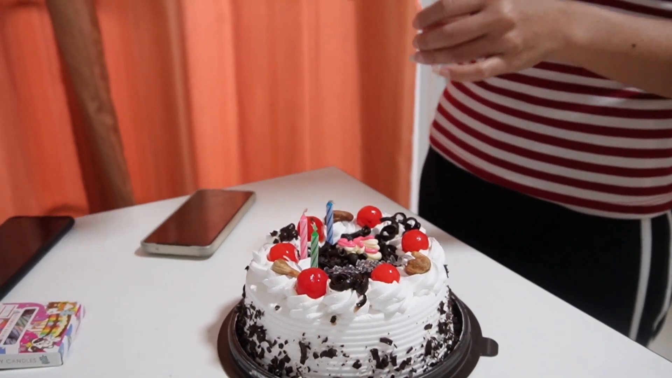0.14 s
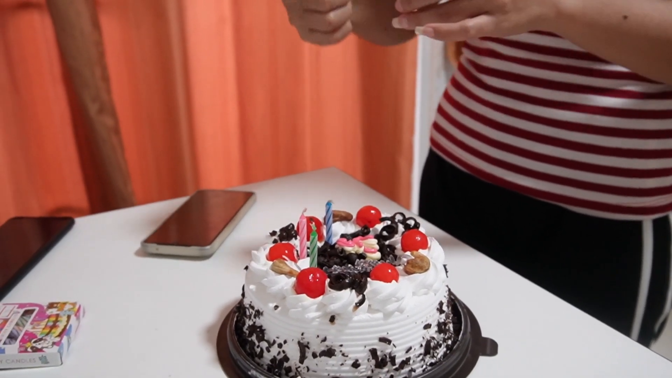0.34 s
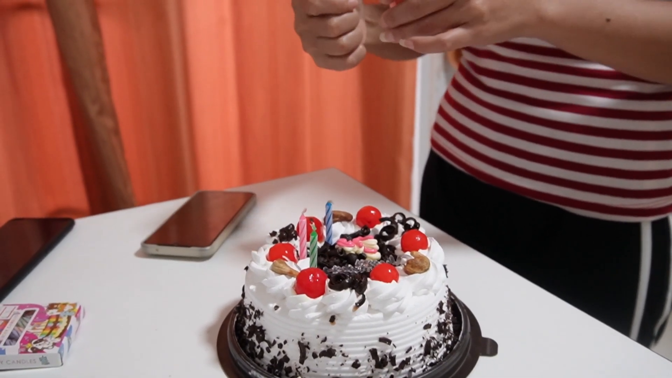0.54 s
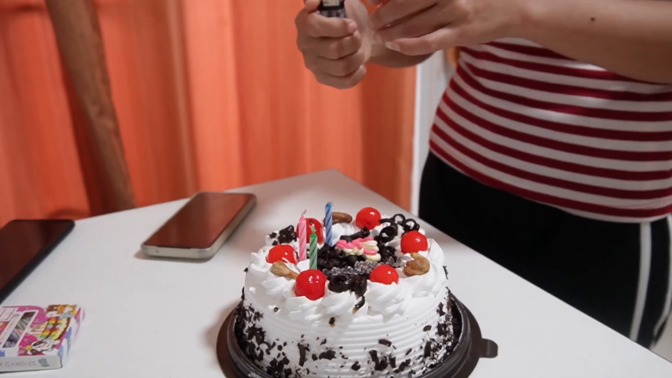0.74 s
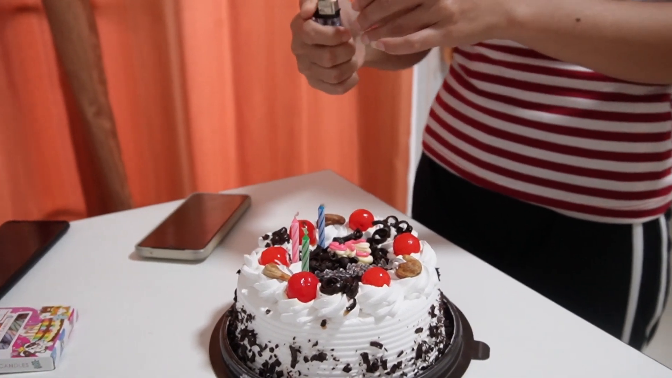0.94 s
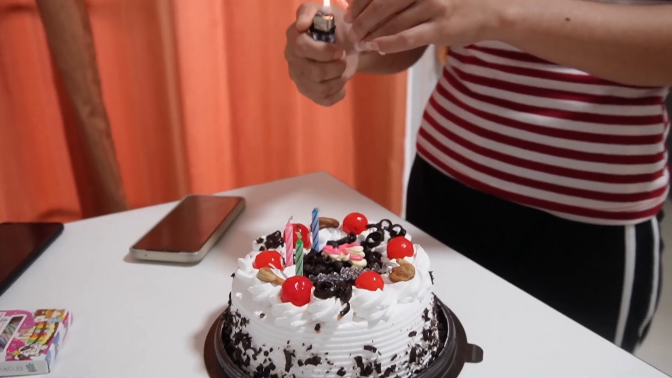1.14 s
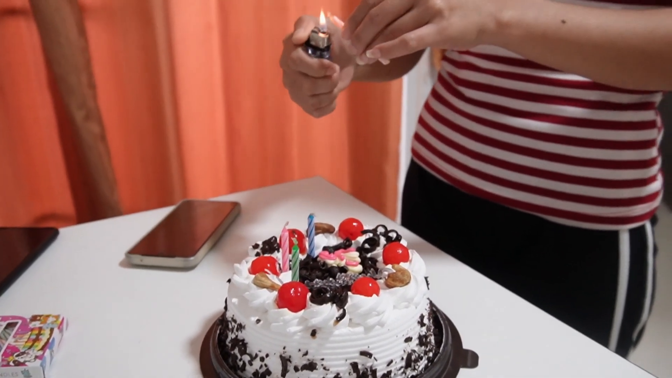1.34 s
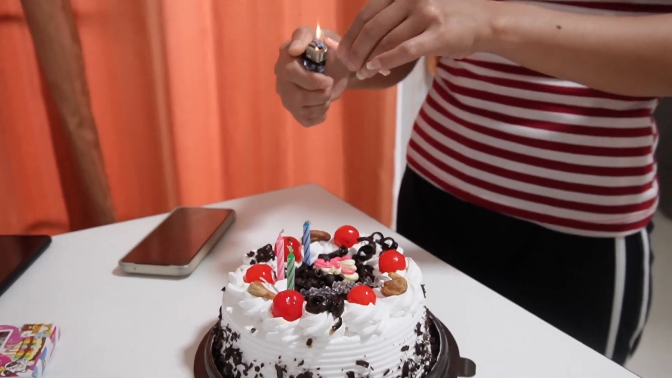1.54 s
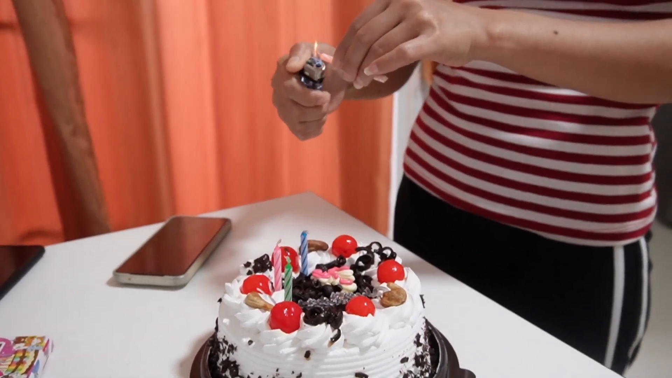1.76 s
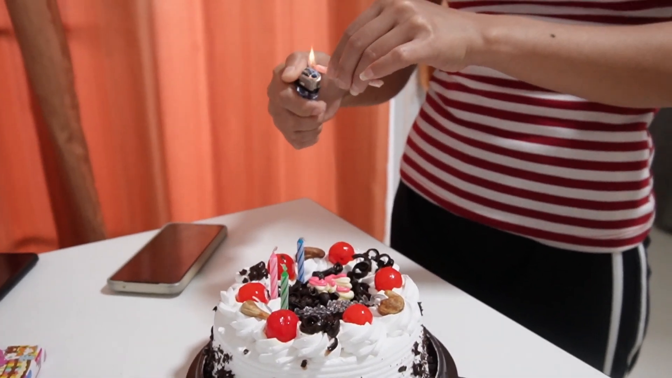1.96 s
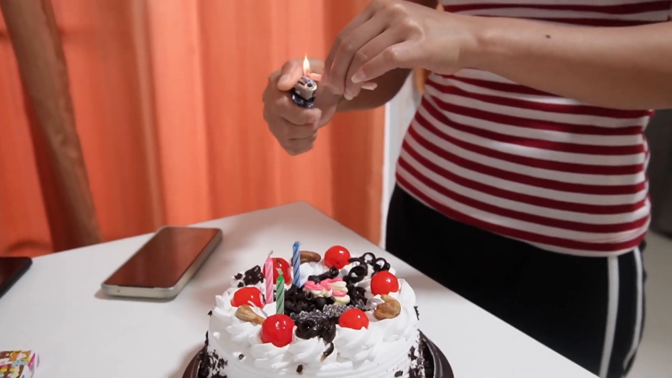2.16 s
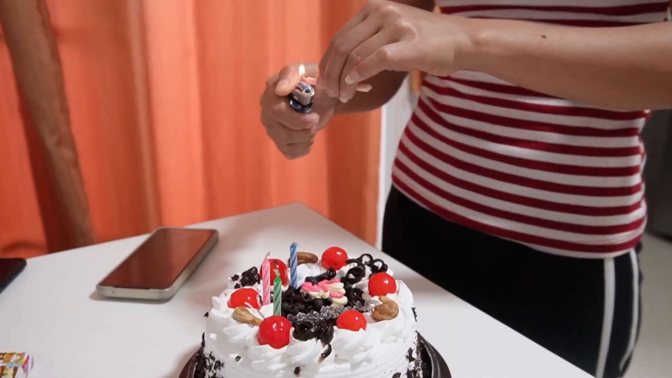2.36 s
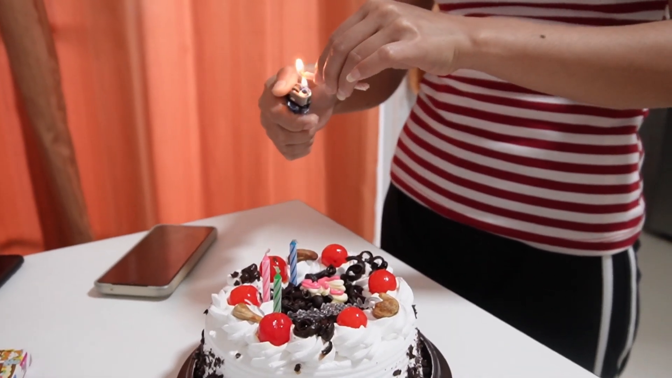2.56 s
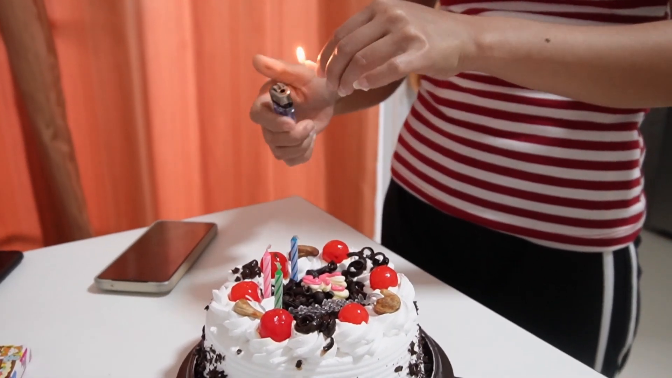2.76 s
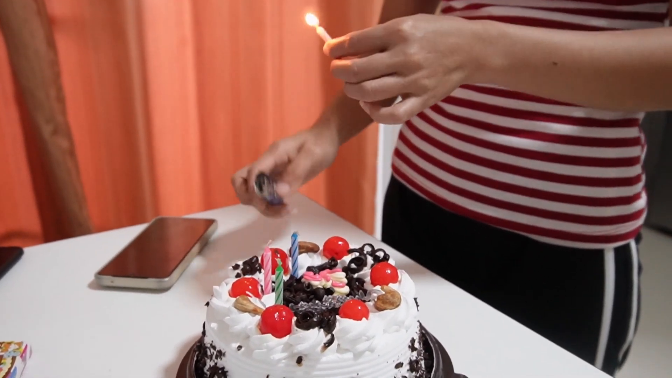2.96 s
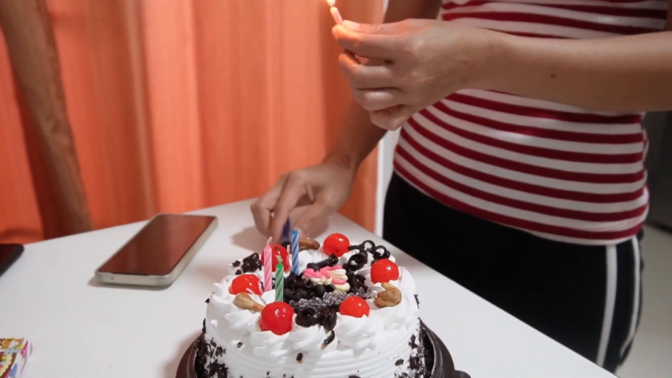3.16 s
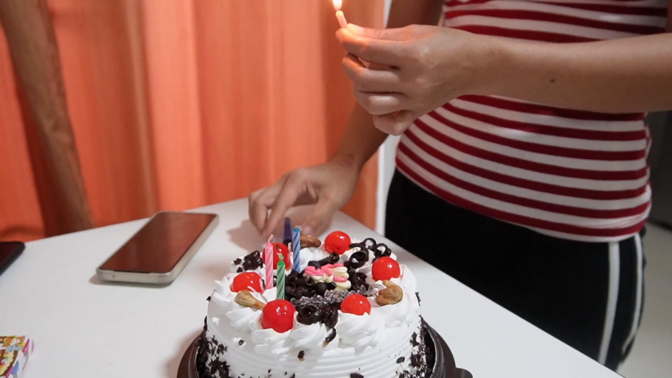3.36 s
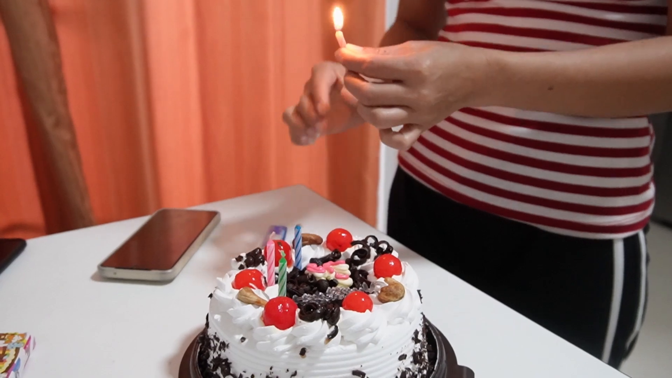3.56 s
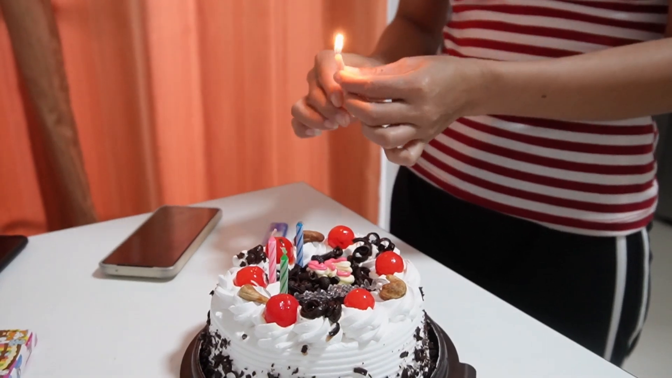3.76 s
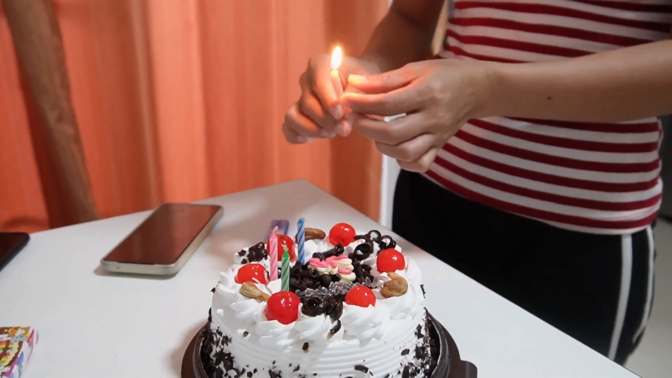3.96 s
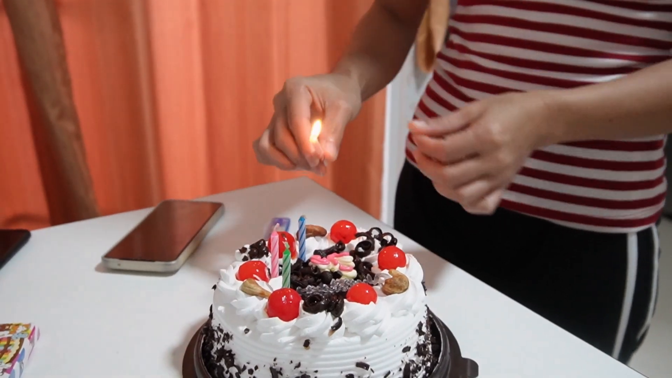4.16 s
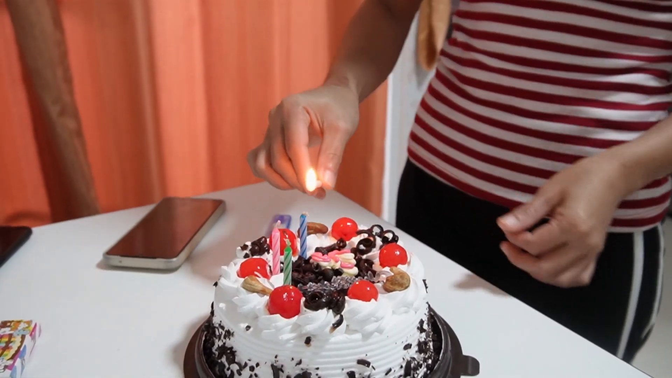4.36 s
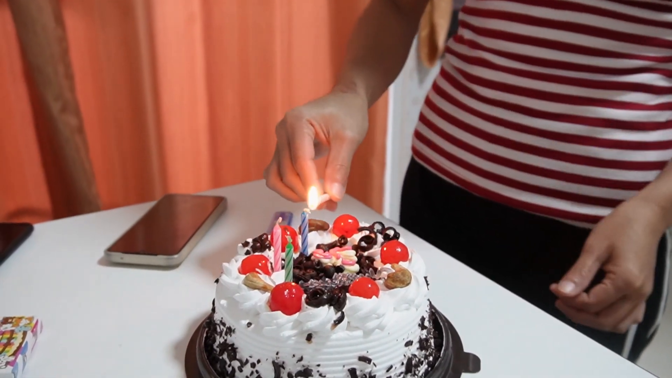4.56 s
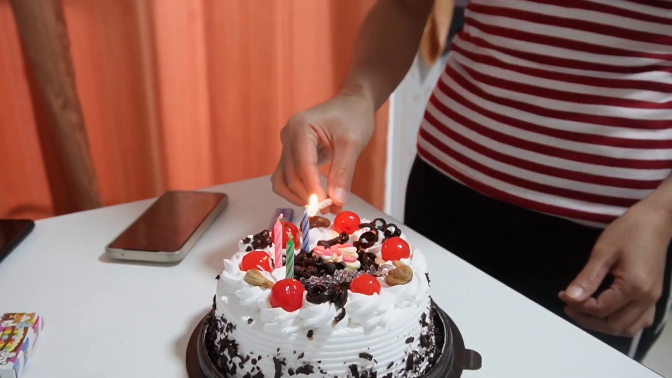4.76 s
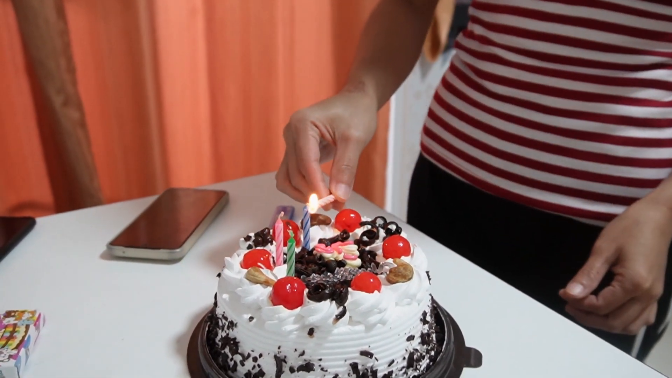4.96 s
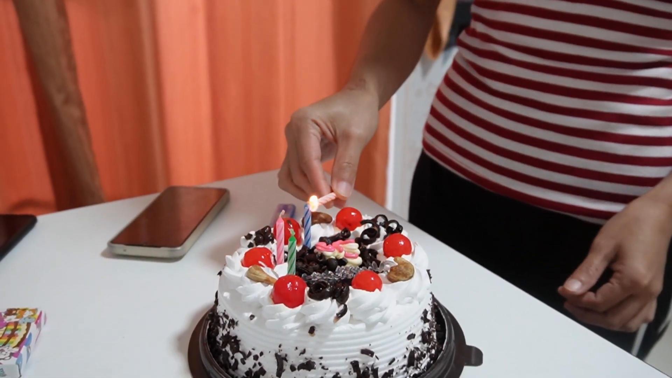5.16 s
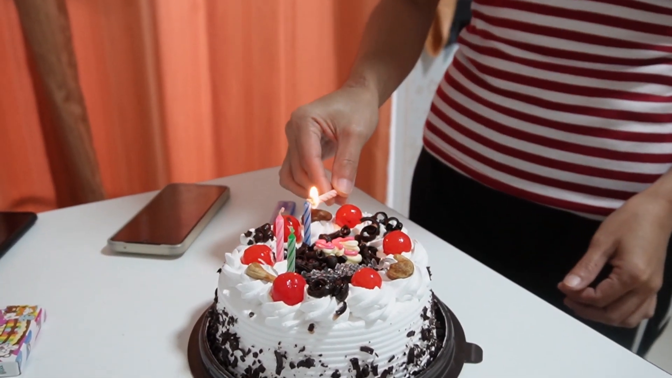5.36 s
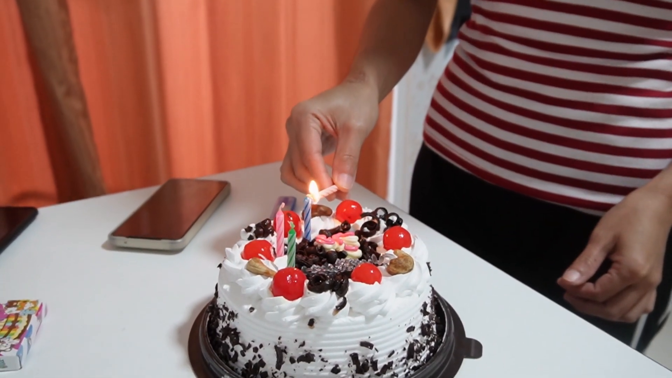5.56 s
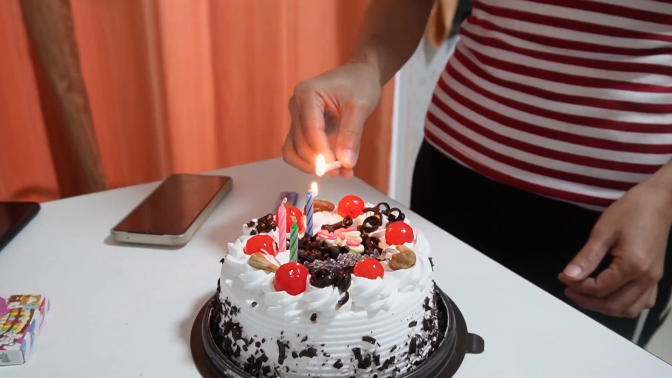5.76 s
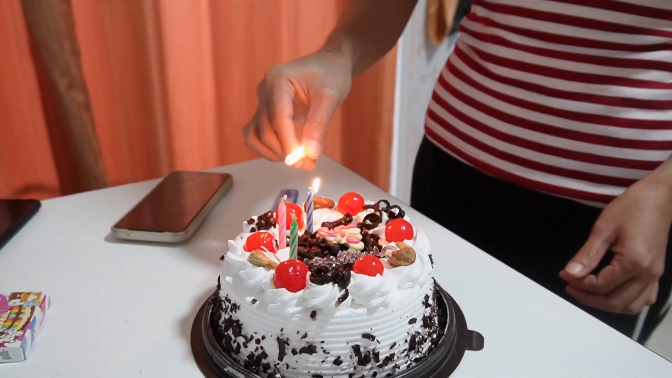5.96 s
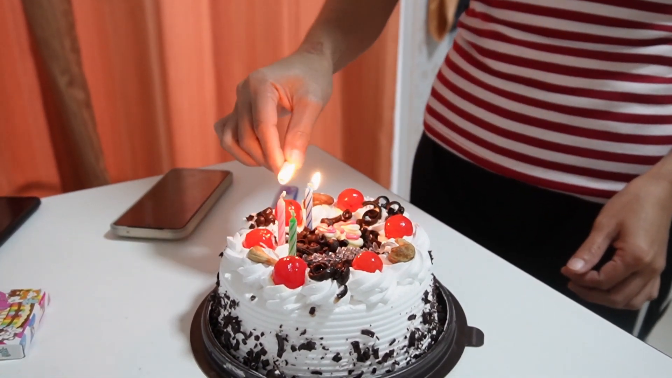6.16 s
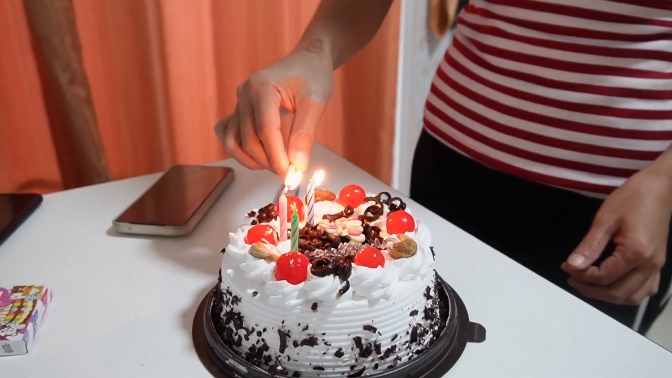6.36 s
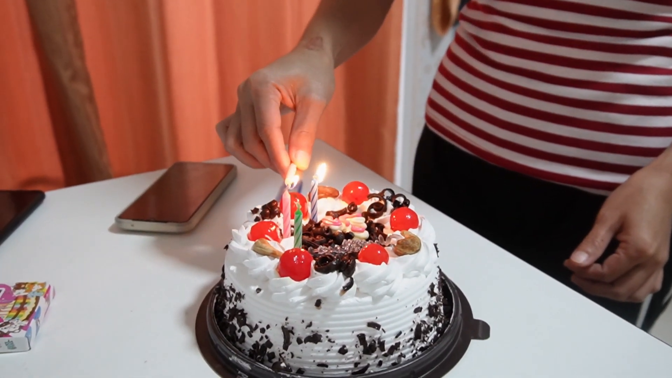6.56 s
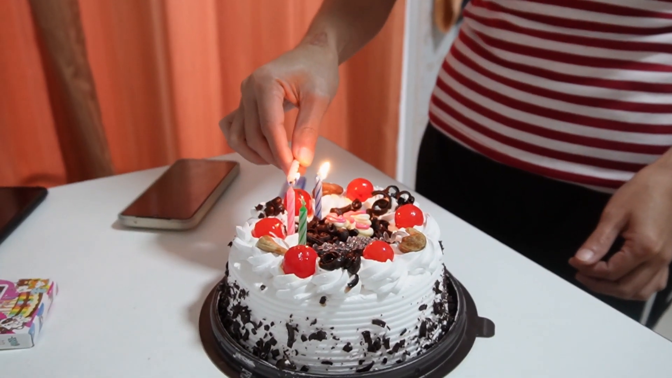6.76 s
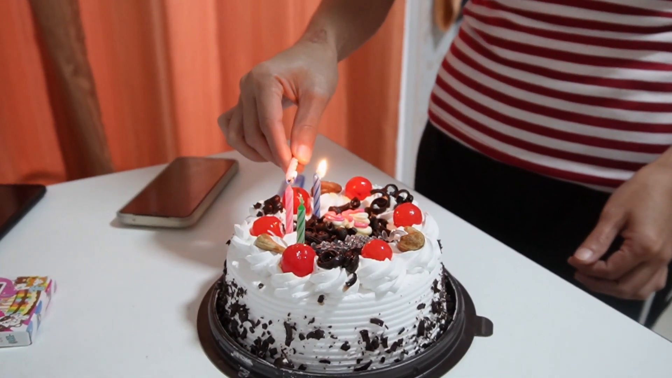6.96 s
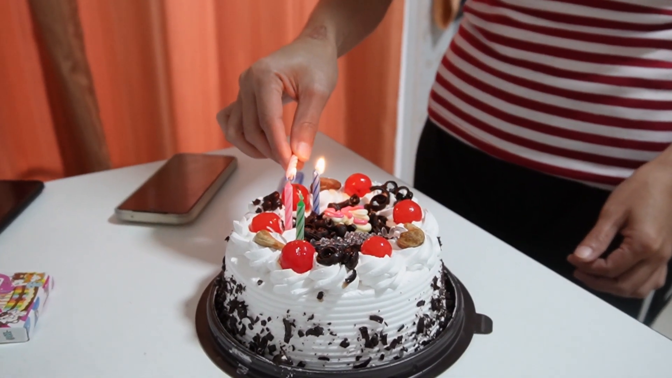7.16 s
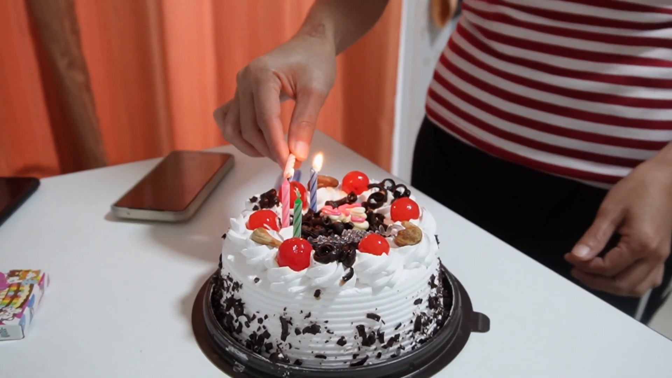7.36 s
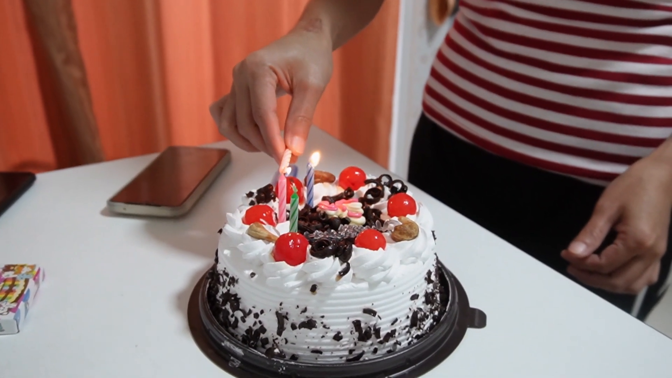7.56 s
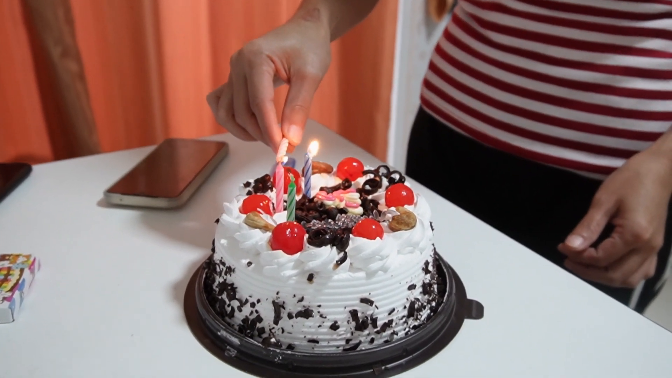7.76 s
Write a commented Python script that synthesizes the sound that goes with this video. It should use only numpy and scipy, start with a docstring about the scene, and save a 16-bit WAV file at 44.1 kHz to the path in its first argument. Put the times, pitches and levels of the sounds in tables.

```python
"""Over a throbbing compressor motor and fan noise, fingers rub a pocket lighter in a hard-walled room and a
thumb spins its flint wheel: friction noise, modulated by the wheel's teeth. The lighter is then dropped
on a table and rocks to rest, each impact exciting the damped modes of both. Late on come a soft hiss
and a creak of separate snaps. The motor's harmonics beat against the pull of the mains throughout."""
import sys
import numpy as np
from scipy import signal
from scipy.fft import rfft, irfft
from scipy.io import wavfile
from scipy.ndimage import uniform_filter1d

SR = 44100
rng = np.random.default_rng(int(sys.argv[2]) if len(sys.argv) > 2 else 0)


def file_out(sig):
    """Save sig as 16-bit WAV at sys.argv[1]."""
    # one column per channel
    cols = np.atleast_2d(sig).T
    # limit, then scale
    lim = np.clip(cols, -1, 1)
    pcm = np.round(lim * 32767).astype(np.int16)
    wavfile.write(sys.argv[1], SR, pcm)


N = 344862

# Spectrum of the wheel scraping flint: (frequency [Hz], relative level [dB])
FLINT_SPECTRUM = [(300, -42), (600, -19), (1040, -13.5), (1860, -14), (2800, -6.5), (4000, -6), (5200, -4),
                  (7500, -3), (10500, -4.5), (12500, -10.5), (15700, -14.5)]
# Short scrapes: faint finger rubs, slips of the wheel and the click of the thumb landing:
# (time [s], relative level [dB], tilt [dB/octave])
SHORT_SCRAPES = [(.155, -57, 12), (.168, -57, 12), (.5605, -50.5, 1), (.573, -53, -5), (.579, -45, -5),
                 (.6165, -43, 0), (.633, -43, -2), (.643, -44, 0.1), (.651, -48, 0.1), (.6575, -36, 0.1),
                 (.6625, -38, 2.1), (.704, -32, -5)]
# Impacts on the table: (time [s], level [dB], contact frequency [Hz], second edge [dB], ring [dB],
# snap [dB], room feed [dB]); the last four are relative
IMPACTS = [(3.1847, -12.5, 3800, 4, -11, -18, 2.5), (3.1935, -28, 4500, -4, -17, -5, -4),
           (3.2639, -4, 3600, -7, -10.5, -26, -2.5), (3.5057, -13, 2900, -26, -14, -38, -5),
           (3.5135, -27.5, 4500, -4, -12, -21, -0.6), (3.545, -1.2, 2700, -27, -12.5, -25.5, -2.2),
           (3.5955, -3.5, 2300, -18.5, -18, -27, -7), (3.598, -24, 6630, -3, -25, -12, 5)]
# Modes of lighter and table: (frequency [Hz], relative level [dB], t60 before the damping limit [s])
BODY_MODES = [(290, -17, .06), (393, -17, .05), (559, -14, .06), (720, -7.5, 0.032), (876, -8, 0.049),
              (1010, -4.5, .025), (1150, -5, 0.021), (1348, -4, 0.022), (1660, 2, .025),
              (1858, -5.5, 0.022), (2190, 2, 0.021), (2610, -9, 0.014), (2900, 3, 0.0095),
              (3350, -2, 0.011), (3800, -4, 0.007), (4670, -10.5, 0.0066), (5630, -4.5, 0.0081)]
# Spectrum of an impact's treble snap: (frequency [Hz], relative level [dB])
SNAP_SPECTRUM = [(2000, -20), (5000, -6), (7200, 4.5), (8500, -3.5), (11000, -7.5), (16000, -9.5)]
# Ticks of the metal hood: (time [s], click level [dB], ring level [dB], longest t60 in the grip [s])
HOOD_TICKS = [(0.179, -50, -48, .045), (1.011, -38, -64, .03), (1.336, -50, -51, .015),
              (3.5993, -51, -33, .035)]
# Modes of the hood: (frequency [Hz], relative level [dB], t60 before the grip's limit [s])
HOOD_MODES = [(4300, -10, .03), (6300, -1, .03), (6740, 0, .09), (10100, -15, .03), (14500, -18, .03)]
# The thumb landing on the gas lever: (time [s], level [dB], frequency [Hz], t60 [s])
THUMB_THUD = (.698, -31, 250, .07)
# Fingers shifting their grip: (time [s], level [dB], swell time [s], tilt [dB/octave])
GRIP_SHIFT = (.03, -62, .13, 0.5)
# Spectrum of their rustle: (frequency [Hz], relative level [dB])
GRIP_SPECTRUM = [(700, -25), (1400, -3), (2100, -1), (3200, -9.5), (6000, -20), (16000, -30)]
# Snaps of the creak: (time [s], relative level [dB])
CREAK_SNAPS = [(7.4195, -61), (7.439, -59), (7.4574, -60), (7.4754, -59), (7.4989, -57.5), (7.5304, -61.5),
               (7.5645, -59), (7.5956, -56.5), (7.6224, -58.5), (7.682, -51), (7.7089, -56),
               (7.7353, -52.5), (7.7545, -52.5), (7.7782, -49.5), (7.8067, -50.5)]
# Spectrum of those snaps: (frequency [Hz], relative level [dB])
CREAK_SPECTRUM = [(2500, -33), (3800, -9), (4600, 3), (5600, -6), (9500, -4.5), (12000, -10), (16000, -16)]
# Spectrum of the hiss at its fullest: (frequency [Hz], relative level [dB])
HISS_SPECTRUM = [(3000, -31.5), (4500, -10.5), (5400, -0.5), (7000, 0.5), (8500, -9), (10000, -3.5),
                 (11500, -14), (12800, -6.5), (16000, -22.5)]
# Slow drift of the compressor's fundamental: (time [s], level [dB])
SHAFT_LEVEL = [(0.1, -46.5), (0.87, -53), (1.8, -53), (2.44, -60), (2.96, -50.5), (4.62, -47.5),
               (5.7, -43.5), (7.7, -45)]
# Its harmonics: (order, level [dB])
SHAFT_HARMONICS = [(2, -60), (3, -52.5), (4, -49), (5, -54.5), (6, -58), (7, -54.5), (8, -71), (9, -67),
                   (11, -72), (12, -73), (13, -66), (14, -68)]
# Tones of the mains pull: (order, offset [multiple of the slip rate], level [dB], time of a crest [s])
MAINS_TONES = [(2, 1, -57, 4.143), (3, 1, -55.5, 4.141), (4, 1, -55, 4.019), (4, 2, -56, 3.939),
               (5, 2, -70, 4.025), (7, 1, -68.5, 3.996)]
# Harmonics of the slower fan motor: (order, level [dB])
FAN_HARMONICS = [(1, -68), (2, -68.5), (3, -64), (4, -68), (5, -67)]
# Other faint steady tones: (frequency [Hz], level [dB])
FAINT_TONES = [(114.9, -69), (155.9, -68), (185.4, -62), (208.8, -65)]
# Spectrum of the compressor's gas puffs: (frequency [Hz], relative level [dB])
PUFF_SPECTRUM = [(200, -35), (450, -7), (700, 1), (1200, -13.5), (2200, -16), (4000, -39)]
# Spectrum of air and casing noise: (frequency [Hz], relative level [dB])
AIR_SPECTRUM = [(20, -22.5), (65, -17.5), (110, -15), (200, -9), (330, -13.5), (380, -20.5), (690, -19.5),
                (800, -27), (1500, -32.5), (3000, -40), (5200, -45), (7500, -48), (12000, -51),
                (16000, -52)]
# Broad whines in that noise: (frequency [Hz], width [Hz], height above it [dB])
AIR_WHINES = [(3708, 150, 4), (5850, 240, 4.5), (6230, 250, 8.5), (8800, 250, 6.5), (9960, 500, 7),
              (14000, 540, 2), (15300, 150, 4.5)]
# Left-right difference of scrapes and snaps: (frequency [Hz], gain [dB])
SIDE_GAIN = [(500, -27), (2400, -18), (4400, -10), (8000, -7), (16000, -3)]
# Early reflections: (delay [s], relative level [dB])
WALL_ECHOES = [(.004, -2), (.0085, -8.5), (.013, -9), (.021, -8)]
# Reverberation time: (frequency [Hz], t60 [s])
ROOM_DECAY = [(300, 0.45), (1300, 0.56), (3500, 0.46), (9000, 0.44), (16000, 0.21)]
# Left-right likeness of diffuse sound: (frequency [Hz], coherence [0 to 1])
COHERENCE = [(60, 0.99), (180, 1.0), (550, 0.91), (1650, 0.72), (4970, 0.36), (15000, 0.11)]

SHAFT_HZ, SLIP_HZ, FAN_HZ = 48.2375, 3.635, 44.31
TIME = np.arange(N) / SR


def flint_wheel():
    """Sliding friction: amid short scrapes the wheel drags, then whirls, each tooth modulating it."""
    drag_s, loose_s, peak_s, stop_s = .61, .676, .685, .717
    bite_s, tooth_period_s, bite_db = .6865, .0058, 4
    corners_s = [drag_s, loose_s - .002, loose_s, peak_s, stop_s]
    level_db = np.interp(TIME, corners_s, [-34, -26, -14, 0, -9], left=-120, right=-120)
    level_db += bite_db * np.cos(2 * np.pi * (TIME - bite_s) / tooth_period_s) * (TIME > peak_s)
    whirl = gain_of(level_db - 23) * coloured(gritty(N, grit_db=3), FLINT_SPECTRUM, tilt_db=1.5)
    swell_s = .0024
    scrapes = [(s, db, swell_s, tilt_db) for s, db, tilt_db in SHORT_SCRAPES]
    return whirl + bursts(scrapes, FLINT_SPECTRUM, grit_db=3)


def table_impacts():
    """Impact excitation: brief contact pulses set modes ringing. Returns direct sound and room feed."""
    direct, room_feed, t = np.zeros(N), np.zeros(N), np.arange(200) / SR
    most_cycles = 38  # the plastic damps every mode within this many cycles
    for s, db, hz, edge_db, ring_db, snap_db, room_db in IMPACTS:
        cycles = hz * t - 1.5
        contact = np.sin(2 * np.pi * cycles) * np.exp(-(cycles / .55) ** 2)
        tilt_db = 11 * np.log2(hz / 2900)  # a sharper contact rings brighter
        modes = [(f, mode_db + tilt_db * np.log2(f / 2000), min(t60, most_cycles / f))
                 for f, mode_db, t60 in BODY_MODES]
        snap = coloured(rng.standard_normal(len(t)), SNAP_SPECTRUM)
        snap *= gain_of(db + snap_db) * np.exp(-t / .002)
        blow = np.zeros(SR // 5)
        add(blow, 0, -contact)
        add(blow, .00055, -gain_of(edge_db) * contact)  # a second edge lands
        add(blow, 1.5 / hz, gain_of(ring_db) * ring(modes, detune=.015, uneven_db=1.5)[:4000])
        add(direct, s, gain_of(db) * blow)
        add(direct, s + 1 / hz, gain_of(-5.5) * snap)  # the snap radiates away from the listener
        add(room_feed, s, gain_of(db + room_db) * blow)
        add(room_feed, s + 1 / hz, gain_of(room_db) * snap)
    return direct, room_feed


def hood_ticks():
    """Free vibration: a broadband click rings the metal hood, and the grip damps it."""
    out, age = np.zeros(N), np.arange(400) / SR / .0004  # age in rise times
    for s, click_db, ring_db, longest_t60 in HOOD_TICKS:
        click = coloured(rng.standard_normal(len(age)), FLINT_SPECTRUM, tilt_db=-8.5)
        add(out, s, gain_of(click_db) * click * age * np.exp(1 - age))
        modes = [(hz, db, min(t60, longest_t60)) for hz, db, t60 in HOOD_MODES]
        add(out, s, gain_of(ring_db) * ring(modes, detune=.0045, uneven_db=0))
    return out


def thumb_thud():
    """Damped resonance: the thumb lands on the gas lever and excites two low modes."""
    out = np.zeros(N)
    s, db, hz, t60 = THUMB_THUD
    add(out, s, ring([(hz, db, t60), (1.4 * hz, db - 6, t60)], detune=.03, uneven_db=-1))
    return out


def grip_rustle():
    """Friction of shifting fingers gives one soft swell of noise."""
    return bursts([GRIP_SHIFT], GRIP_SPECTRUM, grit_db=2.5)


def creak(swell_s=.0011):
    """An irregular pulse train: short snaps in quick succession are heard as a creak."""
    return bursts([(s, db, swell_s, 0) for s, db in CREAK_SNAPS], CREAK_SPECTRUM, grit_db=1.5)


def hiss():
    """Amplitude-modulated noise: a thin, fluttering hiss fills out, dulls and stops."""
    thin_s, crest_s, full_s, flutter_hz = 6.85, 6.975, 7.178, 13
    flutter_db = 5 * np.cos(2 * np.pi * flutter_hz * (TIME - crest_s))
    fade = np.interp(TIME, [thin_s - .08, thin_s, full_s - .05, full_s], [0, 1, 1, 0])
    thin = gain_of(-65 + flutter_db) * fade
    full = gain_of(-58.5) * np.exp(-((TIME - full_s) / .07) ** 2)

    def spectrum_db(hz, t):
        tilt_db = np.clip(45 * (full_s - t), -9, 9) * (abs(t - full_s) < .5)
        return curve_at(HISS_SPECTRUM, hz) + tilt_db * np.log2((hz + 50) / 10000)
    return (thin + full) * diffuse_noise(spectrum_db, size=256)


def compressor_hum():
    """Beating: the mains pull runs ahead of the shaft, so its tones throb against the harmonics."""
    phases = rng.random(20)

    def cycles(order):
        return round(order) * SHAFT_HZ * TIME + phases[round(order)]
    fundamental = tone(np.interp(TIME, *np.transpose(SHAFT_LEVEL)), cycles(1))
    harmonics = sum(tone(db, cycles(order)) for order, db in SHAFT_HARMONICS)
    mains = sum(tone(db, cycles(order) + round(slips) * SLIP_HZ * (TIME - crest_s))
                for order, slips, db, crest_s in MAINS_TONES)
    return fundamental + harmonics + mains


def compressor_valve():
    """Pulsating flow: one puff of gas noise a turn, uneven from stroke to stroke."""
    turns = SHAFT_HZ * TIME
    strength = gain_of(1.9 * rng.standard_normal(int(turns[-1]) + 1))[turns.astype(int)]
    puffs = uniform_filter1d(strength * np.exp(-(turns % 1) / .4), 40)
    gas = diffuse_noise(lambda hz, t: curve_at(PUFF_SPECTRUM, hz), size=1024)
    return gain_of(-64) * unit_rms(puffs) * gas


def fan_hum():
    """Steady rotation gives a harmonic series; a few faint tones sound beside it."""
    partials = [(round(order) * FAN_HZ, db) for order, db in FAN_HARMONICS] + FAINT_TONES
    return sum(tone(db, hz * TIME + rng.random()) for hz, db in partials)


def fan_air():
    """Broadband noise of air and casing, with broad whines and a faintly wavering spectrum."""
    def spectrum_db(hz, t):
        patches = rng.standard_normal((len(t), len(hz))).T
        patches = uniform_filter1d(uniform_filter1d(patches, 20, axis=0), 8, axis=1)
        whines = sum(db / (1 + (2 * (hz - f) / width) ** 2) for f, width, db in AIR_WHINES)
        return curve_at(AIR_SPECTRUM, hz) + whines + 1.1 * unit_rms(patches)
    return gain_of(-49.5) * diffuse_noise(spectrum_db, size=2048)


def stereo_width(x):
    """Decorrelation: the treble differs slightly between left and right."""
    hz = np.fft.rfftfreq(N, 1 / SR)
    taps = rng.standard_normal(60)
    response = rfft(taps / np.linalg.norm(taps), N) * gain_of(curve_at(SIDE_GAIN, hz))
    side = irfft(rfft(x) * response, N)
    return np.array([x + side, x - side])


def room(x):
    """Reverberation: a few wall reflections, then a dense tail whose bands decay at their own rates."""
    hz, spectra = diffuse_spectra(SR // 64, size=256, apart=.75)
    t = np.arange(spectra.shape[2]) * 64 / SR
    decay = gain_of(-60 * t / curve_at(ROOM_DECAY, hz)[:, None])
    tail = signal.istft(spectra * decay, nperseg=256, noverlap=192)[1]
    tail *= np.clip((np.arange(tail.shape[1]) / SR - .002) / .012, 0, 1)  # the echoes build up
    tail /= np.linalg.norm(tail[0])
    for s, db in WALL_ECHOES:
        for side in tail:
            add(side, s + rng.uniform(0, .0002), gain_of([db - 7]))
    return signal.fftconvolve(x[None], tail, axes=1)[:, :N]


def ring(modes, detune, uneven_db):
    """Modal superposition: decaying sines, each shifted in pitch and level by grip and spot struck."""
    t = np.arange(SR // 5) / SR
    sines = np.zeros(len(t))
    for hz, db, t60 in modes:
        pitch_shift, level_shift = rng.standard_normal(2)
        decay = gain_of(db + uneven_db * level_shift - 60 * t / t60)
        sines += decay * np.sin(2 * np.pi * hz * (1 + detune * pitch_shift) * t)
    return sines * (1 - np.exp(-(t / .00039) ** 2))  # soft onset


def bursts(rows, spectrum, grit_db):
    """Transients of gritty noise that swell and decay."""
    out, t = np.zeros(N), np.arange(SR // 2) / SR
    for s, db, swell_s, tilt_db in rows:
        envelope = (t / swell_s * np.exp(1 - t / swell_s)) ** 2
        add(out, s, gain_of(db) * coloured(gritty(len(t), grit_db), spectrum, tilt_db) * envelope)
    return out


def gritty(count, grit_db):
    """Heavy-tailed noise: a few samples stand out."""
    return rng.standard_normal(count) * gain_of(grit_db * np.minimum(rng.exponential(1, count), 5))


def diffuse_spectra(frames, size, apart=1.):
    """A diffuse field is coherent in the bass; apart below 1 makes left and right more alike."""
    hz = np.fft.rfftfreq(size, 1 / SR)
    a, b, c, d = rng.standard_normal((frames, len(hz), 4)).T
    coherence = np.clip(curve_at(COHERENCE, hz), 0, 1)[:, None] ** apart
    mid = np.sqrt(1 + coherence) * (a + 1j * b)
    side = np.sqrt(1 - coherence) * (c + 1j * d)
    return hz, np.array([mid + side, mid - side])


def diffuse_noise(spectrum_db, size):
    """Diffuse noise of unit rms, shaped by spectrum_db(frequency, time)."""
    hz, spectra = diffuse_spectra(4 * N // size + 5, size)
    t = np.arange(spectra.shape[2]) * size / 4 / SR
    spectra *= gain_of(spectrum_db(hz[:, None], t))
    return unit_rms(signal.istft(spectra, nperseg=size, noverlap=3 * size // 4)[1][:, :N])


def coloured(x, spectrum, tilt_db=0.):
    """Filtering by a spectrum, tilted by tilt_db per octave about 6 kHz; unit rms."""
    hz = np.fft.rfftfreq(len(x), 1 / SR)
    level_db = curve_at(spectrum, hz) + tilt_db * np.log2((hz + 50) / 6000)
    return unit_rms(irfft(rfft(x) * gain_of(level_db), len(x)))


def curve_at(points, hz):
    f, value = np.transpose(points)
    return np.interp(np.log(hz + 1), np.log(f + 1), value)


def tone(rms_db, cycles):
    return np.sqrt(2) * gain_of(rms_db) * np.cos(2 * np.pi * cycles)


def gain_of(db):
    return 10 ** (np.asarray(db) / 20)


def unit_rms(x):
    return x / np.sqrt(np.mean(x ** 2) + 1e-20)


def add(mix, s, sound):
    part = mix[round(s * SR):][:len(sound)]
    part += sound[:len(part)]


def scene():
    """Superposition of direct sound, reverberation and background."""
    strike = flint_wheel()
    handling = hood_ticks() + thumb_thud() + grip_rustle()
    snaps = creak()
    impacts, impact_feed = table_impacts()
    balance = gain_of([[.3], [-.3]])  # slightly to the left
    direct = stereo_width(strike + snaps) * balance + handling + impacts
    reverberant = room(gain_of(-6.8) * (strike + handling) + gain_of(-3) * snaps + impact_feed)
    machines = compressor_hum() + fan_hum() + fan_air() + compressor_valve()
    return direct + reverberant + machines + hiss()


def record(dry):
    """Band limiting: a steep low-pass filter removes the treble above 15.8 kHz."""
    lowpass = signal.firwin(1023, 15800, window=("kaiser", 9), fs=SR)
    return signal.oaconvolve(dry, lowpass[None], "same")


dry = scene()
out = record(dry)
file_out(out)
```